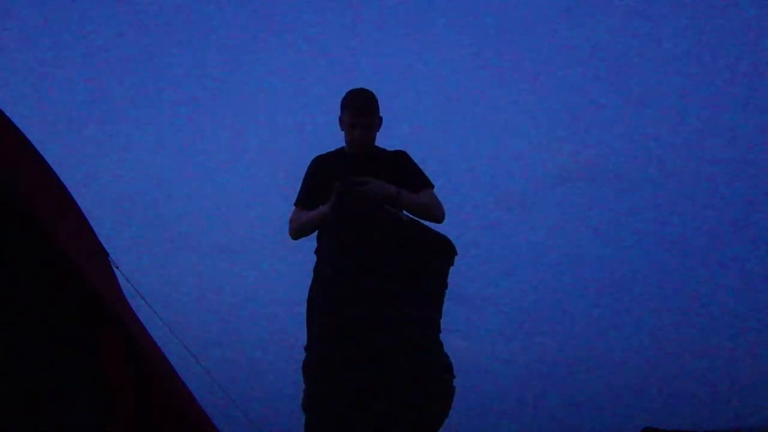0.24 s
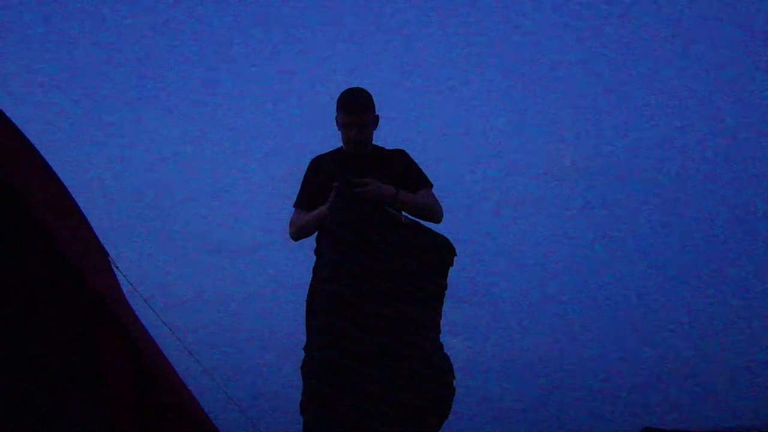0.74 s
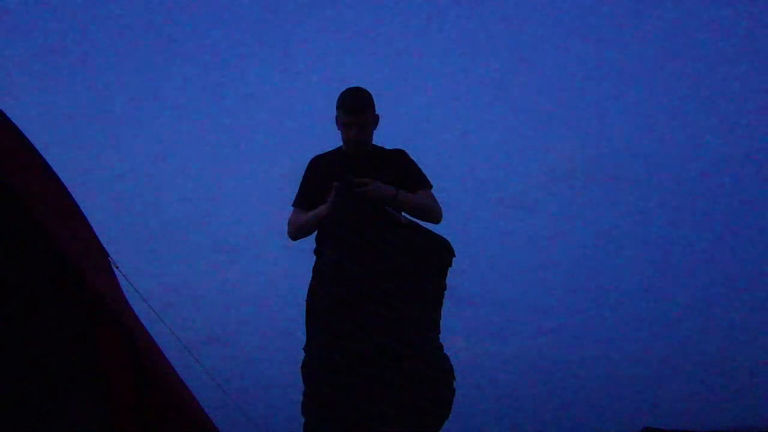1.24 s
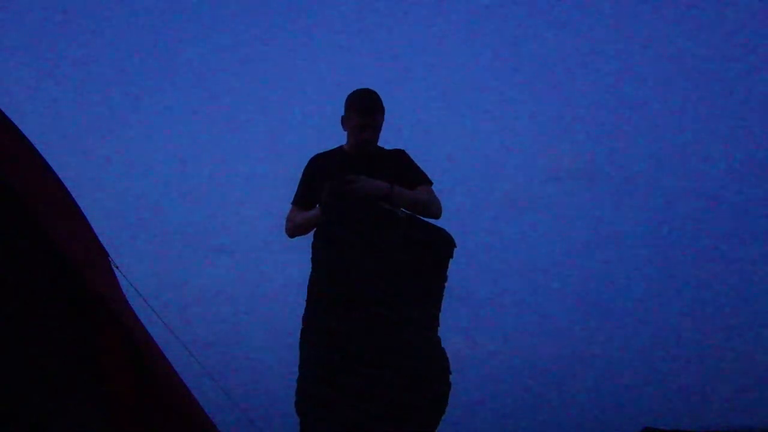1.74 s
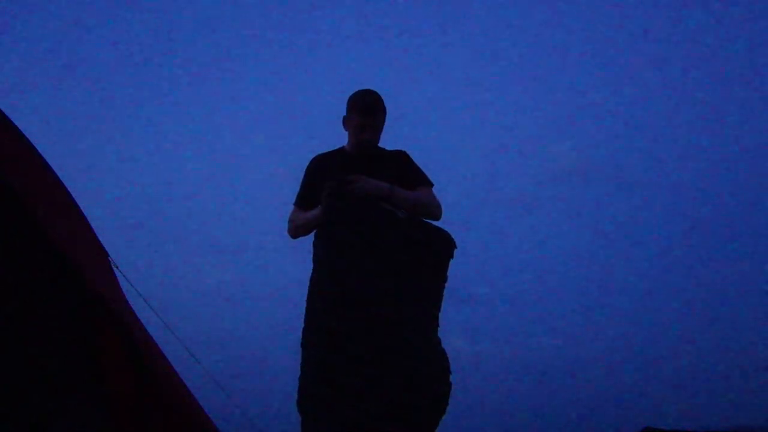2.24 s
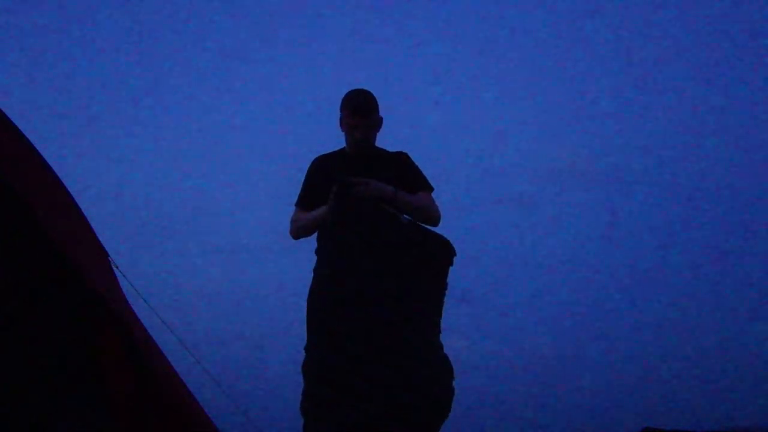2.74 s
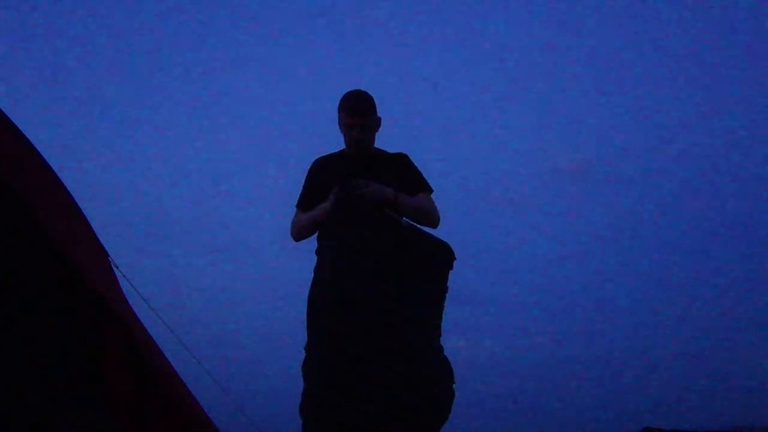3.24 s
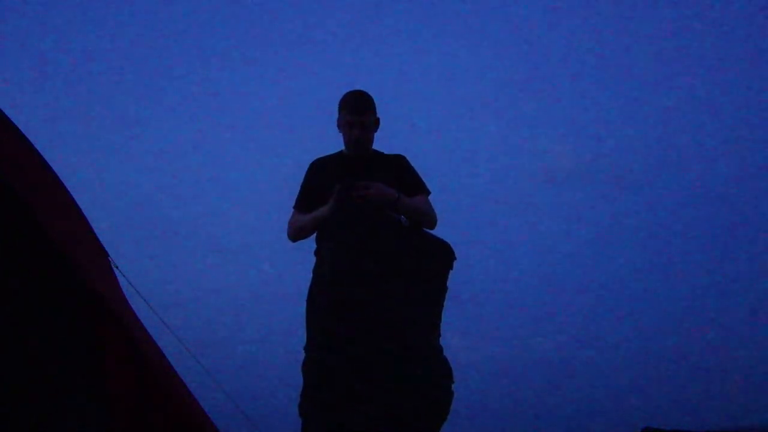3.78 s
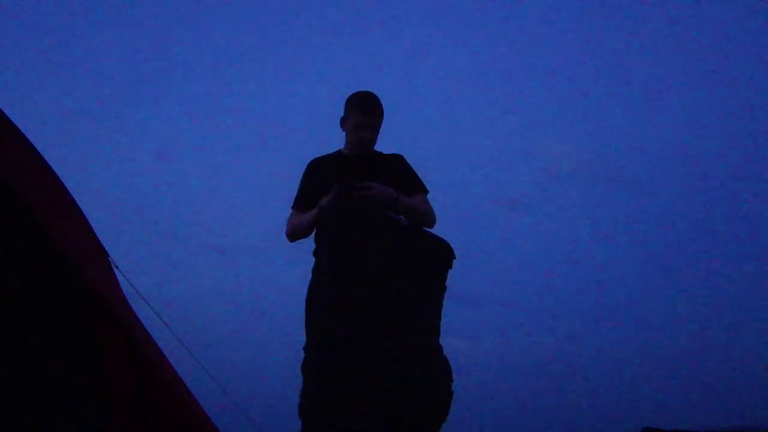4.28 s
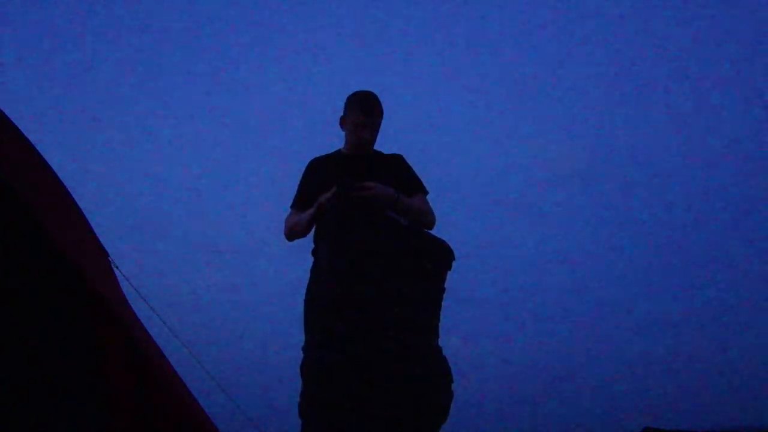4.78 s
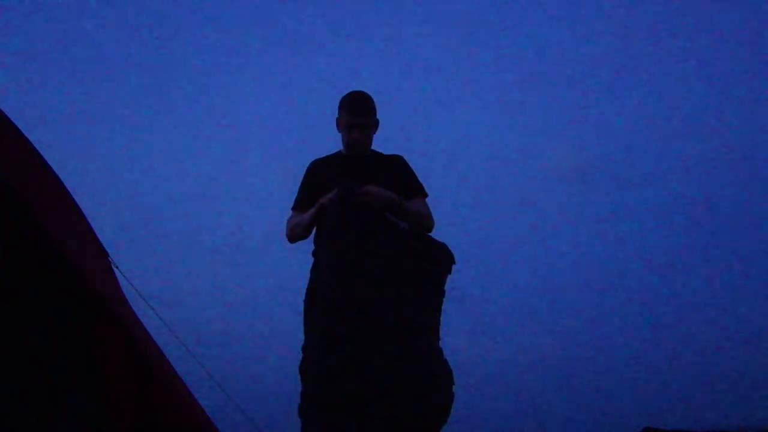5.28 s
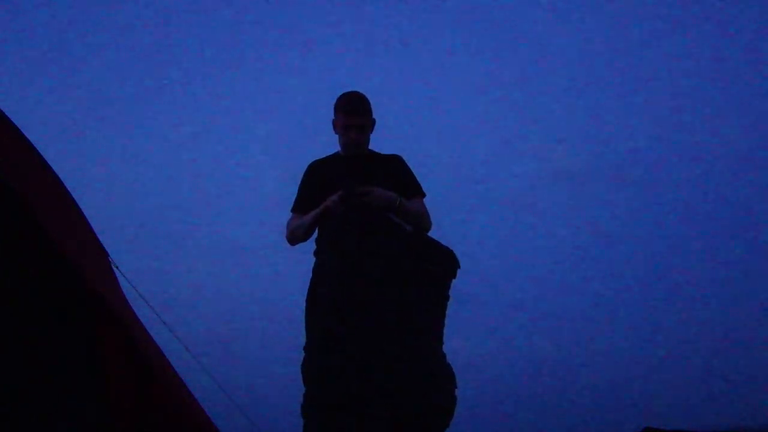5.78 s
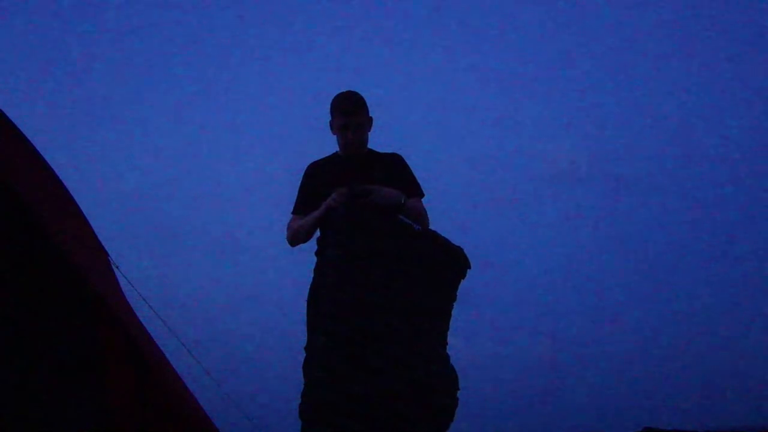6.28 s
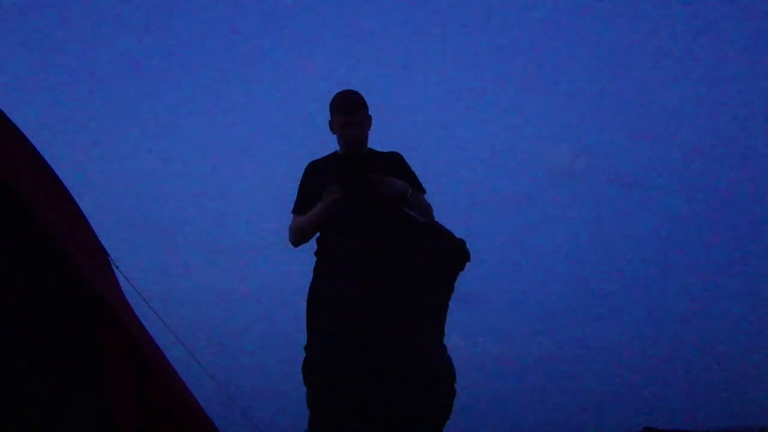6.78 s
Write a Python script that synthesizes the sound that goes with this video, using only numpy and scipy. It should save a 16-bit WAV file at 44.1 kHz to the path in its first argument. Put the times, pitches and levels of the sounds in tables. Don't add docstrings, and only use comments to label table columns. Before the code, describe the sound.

A small electric pump whines and roars with air, is switched off, whirs downward into a brief whistling sigh, then a cap clicks shut outdoors.

```python
import sys
import numpy as np
from scipy import signal
from scipy.fft import rfft, irfft, next_fast_len
from scipy.io import wavfile
from scipy.ndimage import map_coordinates

SR = 44100
rng = np.random.default_rng(int(sys.argv[2]) if len(sys.argv) > 2 else 0)


def boost(x):
    u = np.asarray(x, float) / 20
    return 10 ** u


def transcribe(u):
    v = np.clip(np.atleast_2d(u).T, -1, 1)
    q = np.round(v * 32767).astype(np.int16)
    wavfile.write(sys.argv[1], SR, q)


N = 309582
OFF_S = 4.728


def rms_one(x):
    return x / np.sqrt(np.mean(np.abs(x) ** 2) + 1e-20)


def in_time(rows):
    s, *columns = np.transpose(rows)
    return [np.interp(np.arange(N) / SR, s, c) for c in columns]


def at_hz(points, hz):
    points_hz, values = np.transpose(points)
    return np.interp(np.log(hz), np.log(points_hz), values)


def drift(rate_hz):
    r = np.exp(-80 * np.pi * rate_hz / SR)
    coarse = rng.standard_normal(N // 40 + 2002)
    slow = signal.lfilter([1], [1, -2 * r, r * r], coarse)[2000:]
    return np.interp(np.arange(N) / 40, np.arange(len(slow)), rms_one(slow - slow.mean()))


def turn(hz):
    return 2 * np.pi * np.cumsum(hz) / SR


def swell_db(s, rise_db_per_s, fall_db_per_s, bend_db=0, hold_s=0):
    t = np.arange(N) / SR - s
    after = np.maximum(t - hold_s, 0)
    return rise_db_per_s * np.minimum(t, 0) - fall_db_per_s * after - bend_db * after ** 2


def pair(mid, side, alike):
    return (np.sqrt(1 + alike) * mid + np.sqrt(1 - alike) * side * [[1], [-1]]) / np.sqrt(2)


def bands(spectrum, likeness, edges, patchy_db, change_db):
    out, white = 0, rng.standard_normal((2, 2, N))
    for k, (low, high) in enumerate(zip(edges, edges[1:])):
        band = signal.butter(3, [low, high], "band", fs=SR, output="sos")
        mid, side = signal.sosfilt(band, white[k % 2])
        hz = np.sqrt(low * high)
        flicker_db = patchy_db * (drift(0.82) + 0.64 * drift(13.0))
        level_db = at_hz(spectrum, hz) + flicker_db + change_db(hz)
        out = out + boost(level_db) * pair(mid, side, at_hz(likeness, hz))
    return out


# pitch_hz, left_right_likeness [-1..1]
NEAR_LIKENESS = [(500, .97), (2000, .955), (4000, .89), (7000, .8), (12000, .72)]


def blown(hz, width_hz):
    r = np.exp(-np.pi * width_hz * 1.55 / SR)
    swing = rng.standard_normal((2, N)) + 1j * rng.standard_normal((2, N))
    ringing = signal.lfilter([1], [1, -2 * r, r * r], swing)
    mid, side = np.real(ringing * np.exp(1j * turn(hz)))
    return rms_one(pair(mid, side, at_hz(NEAR_LIKENESS, np.median(hz))))


# start_s, rate_hz [turns per s]
SHAFT = [(0, 699.1), (.5, 702.3), (.65, 704.8), (1.1, 702.8), (1.55, 701.8), (1.7, 704.3), (2.15, 701.6),
         (2.7, 703.8), (2.9, 702.2), (3.35, 704.4), (3.75, 701.2), (4.1, 702.5), (4.728, 701.6)]


def shaft_hz():
    drag_hz, drag_s, friction_hz_per_s = 314.7, .4062, 226.9
    coast_s = np.maximum(np.arange(N) / SR - OFF_S, 0)
    lost_hz = drag_hz * (1 - np.exp(-coast_s / drag_s)) + friction_hz_per_s * coast_s
    return np.maximum(in_time(SHAFT)[0] - lost_hz, 5)


# start_s, echo_hz [lowest pitch the pad's echo cancels], shading_db
GRIP = [(0, 2670, 0.5), (.5, 2546, 1), (1.3, 2505, -1), (1.55, 2790, 0), (2.2, 2750, 0), (2.5, 2480, -0.5),
        (2.75, 2290, -0.5), (2.95, 2240, 0.5), (3.2, 2100, -4), (3.5, 2176, 0), (4.2, 2150, -4.5),
        (4.4, 2300, -8), (4.65, 2190, -9.5), (4.76, 2180, -4.5), (5.5, 2190, -8.5)]


def pad_fill():
    return np.minimum(np.arange(N) / SR / OFF_S, 1)


def layer_db(db, fill_db, shaded, lean_db, power=0):
    echo_hz, shade_db = in_time(GRIP)
    lean = (echo_hz - 2500) / 250
    speed_db = 20 * np.log10(np.minimum(shaft_hz() / 697, 1))
    return db + fill_db * pad_fill() + shaded * shade_db + lean_db * lean + power * speed_db


# start_s, length_s, shaft_multiple, level_db
COVERED = [(2.58, .2, 7, -15), (3.02, .53, 7, -14), (0, 1.4, 9, -6), (2.45, .5, 9, -7), (3.85, .55, 7, -15),
           (0, .9, 14, -14), (1.3, .2, 14, -10), (2.45, .75, 14, -9), (4.2, .6, 14, -18),
           (2.95, .95, 13, -8), (4.25, .5, 13, -12), (1.55, .75, 15, -7), (4.3, .5, 5, -8)]
HELD = {1: (-41.5, 10.5, -0.42, 2.5), 5: (-39, 4, 0.5, 0), 6: (-34.5, 8, 0.87, 1.2),
        7: (-38, -4, 0.5, -0.5), 13: (-44, -2, 1, -3.5), 14: (-37, -6.5, 0.7, 0), 15: (-39.5, -2, -0.1, 1)}
# shaft_multiple, level_db
DRIVEN = [(2, -42), (3, -36), (4, -41), (8, -56), (9, -53), (10, -62), (11, -54), (12, -50), (16, -51),
          (17, -58), (18, -51)]


def driven_partial_db(k):
    t, edge_s = np.arange(N) / SR, 0.05
    level_db = layer_db(*HELD[k]) if k in HELD else dict(DRIVEN).get(k, -90)
    for s, length_s, hidden, db in COVERED:
        if hidden == k:
            inside_s = np.minimum(t - s, s + length_s - t)
            level_db = level_db + db * np.clip(inside_s / edge_s + .5, 0, 1)
    return level_db


# pitch_hz, level_db
HOUSING = [(600, -70), (1500, -54), (2600, -64), (3600, -57.5), (5300, -64.5), (6200, -73), (7500, -80),
           (9000, -60), (9800, -58), (10450, -43.5), (11200, -51), (12200, -64), (13300, -64)]


def coasting_partial_db(k, shaft, speed_db):
    if k == 1:
        return -26.5 + 5.2 * speed_db
    level_db = at_hz(HOUSING, k * shaft) + 1.44 * speed_db
    level_db = level_db + swell_db(5.85, 0, 35)
    level_db = level_db + 5 * (k % 3 == 0) + 1 * (k % 9 == 0)
    if k <= 13:
        level_db = level_db + 13 + 3 * np.cos(2 * np.pi * k * shaft / 1000)
    return level_db + 4 * (k == 13)


def motor():
    shaft, stop_s = shaft_hz(), 6.3
    phase = turn(shaft)
    off = np.clip((np.arange(N) / SR - OFF_S) / .09, 0, 1)
    speed_db, out = layer_db(0, 0, 0, 0, power=1), np.zeros(N)
    for k in range(1, 150):
        heard = slice(np.argmax(k * shaft < 13500), int(stop_s * SR))
        level_db = (1 - off) * driven_partial_db(k) + off * coasting_partial_db(k, shaft, speed_db)
        slow_db = (0.8 + .06 * k) * (1 - off) * drift(.8)
        level_db = level_db + slow_db + (1.1 + 2.2 * off) * drift(14.)
        tone = np.sin(k * phase[heard] + rng.uniform(0, 2 * np.pi))
        out[heard] += np.sqrt(2) * boost(level_db[heard]) * tone
    return out


# pitch_hz, level_db [per Hz]
AIR = [(450, -51), (700, -18), (950, -17.5), (1200, -8), (1500, -2.5), (1800, 0), (2300, -2.5),
       (3100, -8.5), (3500, -23.5), (5100, -19), (5600, -40), (7200, -27.5), (12600, -26.5), (13300, -32)]


def roar(surge_db):
    low = layer_db(0.48, -1.05, -0.17, -0.13, power=1.7)
    mid = layer_db(-0.26, 1.2, 0.7, -1, power=2.4) + surge_db
    high = layer_db(-0.3, -1, -0.1, -1.4, power=1.5) + 0.38 * surge_db

    def change_db(hz):
        return low if hz < 2300 else mid if hz < 3600 else high

    noise = bands(AIR, NEAR_LIKENESS, np.geomspace(480, 13300, 24), 1.0, change_db)
    return boost(-22.5) * noise / np.sqrt(np.mean(noise[:, :int(4.2 * SR)] ** 2))


# start_s, pitch_hz
VALVE = [(0, 1397), (4.7, 1304), (4.795, 1273), (4.81, 1210), (4.9, 1150), (4.96, 1025), (5.02, 1055),
         (5.12, 1006), (5.38, 977), (5.56, 917)]
# level_db, fill_db, shading_share, lean_db
NOZZLE = (-30, 9, 0.22, 0.2)


def cavities(surge_db):
    t = np.arange(N) / SR
    sigh_s = 4.92
    sigh_hz = 1936 - 250 * np.clip(t - sigh_s, 0, 1)
    sigh_db = -25.5 + swell_db(sigh_s, 300, 20) + swell_db(5.7, 0, 60)
    fan_box_db = layer_db(-20.5, 3.5, 1.62, -0.3, power=2) + surge_db - 2.0
    nozzle_db = layer_db(*NOZZLE) + swell_db(OFF_S, 0, 90) - 1.5
    leak_db = -36.5 + swell_db(5.5, 14, 0, bend_db=53.5)
    rustle_db = -46 + swell_db(5.76, 110, 46)
    resonances = ((np.full(N, 2620), 600, fan_box_db),
                  (in_time(VALVE)[0], 140, nozzle_db),
                  (sigh_hz, 130, sigh_db),
                  (np.full(N, 1024), 450, leak_db),
                  (np.full(N, 3480), 1600, rustle_db))
    return sum(boost(level_db + drift(14.5)) * blown(hz, width_hz) for hz, width_hz, level_db in resonances)


# pitch_hz, width_hz
SLOTS = [(8580, 600), (10900, 590), (11530, 160), (9350, 310)]
# level_db, fill_db, shading_share, lean_db, shaft_speed_power [dB per dB]
SLOT_HISS = [(-44.5, 0, -0.59, 0.46, 3), (-36, 2.5, 1.63, .1, 2.1), (-43, 9.5, 1.2, 3, 2.2),
             (-46, 1, -0.73, 0.9, 2.2)]


def slots():
    out = 0
    for (hz, width_hz), answer in zip(SLOTS, SLOT_HISS):
        level_db = layer_db(*answer) + 1.5 * drift(2.5) + 1.7 * drift(21.0)
        out = out + boost(level_db) * blown(np.full(N, hz), width_hz)
    return out


# start_s, level_db, length_s
SURGES = [
    (.01, 1, .05),
    (3.013, 3.5, 0.013),
    (3.42, 3.5, 0.029),
    (4.855, 4.5, 0.14),
]


def airflow():
    t = np.arange(N) / SR
    surge_db = sum(db * np.exp(-((t - s) / length_s) ** 2) for s, db, length_s in SURGES)
    return (roar(surge_db) + cavities(surge_db) + slots()) * boost(0.4 * drift(32.0))


def pad_echo(x):
    echo_hz, _ = in_time(GRIP)
    mid_band = signal.butter(2, [2160, 3700], "band", fs=SR, output="sos")
    mids = signal.sosfiltfilt(mid_band, x)
    late = np.arange(N) - 3 * SR / echo_hz
    x = x - 0.4 * np.array([map_coordinates(m, [late], order=3) for m in mids])
    spin = np.exp(1j * turn(echo_hz))
    near = signal.sosfiltfilt(signal.butter(1, 55, fs=SR, output="sos"), x / spin)
    depth = .95 - .55 * pad_fill()
    return x - 2 * depth * np.real(near * spin)


# pitch_hz, level_db [per Hz]
OUTDOORS = [(30, -29), (70, -23), (110, -13), (200, -3), (450, -3), (750, -4), (1100, 3.5), (1500, -10),
            (2500, -11), (4000, -15), (7000, -21), (11000, -21), (12600, -37), (13800, -60)]
# pitch_hz, left_right_likeness [-1..1]
WIDE_LIKENESS = [(60, 0.95), (150, 0.068), (360, -0.65), (900, -0.34), (2220, -0.4), (5470, -0.39),
                 (13500, -0.071)]


def outdoors():
    bed = bands(OUTDOORS, WIDE_LIKENESS, np.geomspace(30, 13800, 20), 0.2, lambda hz: 0)
    return boost(-37) * rms_one(bed)


def electronics_whine():
    return boost(-68) * np.sin(turn(np.full(N, 7900)))


# start_s, level_db [peak], fade_db_per_s, bend_db_per_s2
WHISTLE = [
    (4.74, -20, 150, 100),
    (4.825, -21, 330, 100),
    (4.97, -31, 10, 100),
    (5.034, -11, 9, 118),
]


def whistle():
    hz, = in_time(VALVE)
    level = sum(boost(db + swell_db(s, 650, fade_db, bend_db)) for s, db, fade_db, bend_db in WHISTLE)
    phase = turn(hz * (1 + 0.00483 * drift(35.)))
    octave = boost(-19.5 + 3.6 * drift(32.0)) * np.sin(2 * phase + 0.5)
    tone = np.sqrt(2) * (np.sin(phase) + octave)
    return level * (boost(0.8 * drift(50.0)) * tone + boost(-18) * blown(hz, 130))


def ring(clicks, hz, t60_s):
    r, w = boost(-60 / (t60_s * SR)), 2 * np.pi * hz / SR
    return signal.lfilter([0, np.sin(w)], [1, -2 * r * np.cos(w), r * r], clicks + 1e-18)


# start_s, level_db [peak], t60_s, pan_db [left over right], pitch_hz
TICKS = [
    (5.638, -25, 0.0032, 0.0, 3000),
    (6.219, -25, 0.0052, -1, 750),
    (6.317, -30, 0.004, -2, 2630),
    (6.571, -25, 0.0027, -4, 4500),
    (6.623, -24.5, 0.01, -0.5, 800),
    (6.687, -27.5, 0.0035, -5, 5330),
    (6.881, -10.5, 0.003, -2.0, 3140),
    (7.014, -29, 0.0072, 2.5, 2500),
]


def ticks():
    out = np.zeros((2, N))
    for s, peak_db, t60_s, pan_db, hz in TICKS:
        click = np.zeros(N)
        click[round(s * SR)] = boost(peak_db)
        snap = ring(click, hz, t60_s) + 0.23 * ring(click, 0.71 * hz, 2.2 * t60_s)
        snap += 0.68 * np.diff(click, prepend=0)
        out += snap * boost(np.array([[.5], [-.5]]) * pan_db)
    return out


# start_s, level_db, hold_s
CAP_SLIP = [
    (6.818, -18.5, .0055),
    (6.8294, -27, .001),
    (6.8376, -28, .001),
    (6.849, -34, .001),
    (6.854, -33, .001),
]
# pitch_hz, level_db, t60_s
CAP_MODES = [(2220, -2.5, 0.0081), (3890, -4.5, 0.011), (7300, -6, 0.004), (9100, -12, .002),
             (11300, 0.5, .0015)]


def cap_scrape():
    force = sum(boost(db + swell_db(s, 30000, 3000, hold_s=hold_s)) for s, db, hold_s in CAP_SLIP)
    slips = (rng.random(N) < 4000 / SR) * force * rng.standard_normal(N)
    push = np.diff(slips, prepend=0)
    return sum(boost(db) * ring(push, hz, t60_s) * 4000 / hz for hz, db, t60_s in CAP_MODES)


# pitch_hz, level_db [left over right]
PORTS = [(500, -2.5), (1400, 1), (2100, -2), (2800, -3.5), (3500, -2.5), (4200, 4), (4900, 11), (5600, -1),
         (6400, 11), (7700, 5), (9100, -1.5), (9900, 9), (11000, 0.5), (13000, 8)]


def at_ports(x):
    size = next_fast_len(N + 2048)
    hz = np.maximum(np.fft.rfftfreq(size, 1 / SR), 1)
    half = boost(at_hz(PORTS, hz) / 2)
    lead_s = 1.8e-5 / (1 + (hz / 6500) ** 4)
    small = 1 / np.sqrt(1 + (380 / hz) ** 8)
    left = half * np.exp(2j * np.pi * hz * lead_s)
    return irfft(rfft(x, size) * small * [left, 1 / half], size)[:, :N]


def scene():
    pump = motor() + pad_echo(airflow()) + whistle()
    return at_ports(pump + ticks() + cap_scrape()) + electronics_whine() + outdoors()


def low_pass(x):
    return signal.sosfilt(signal.butter(12, 14100, fs=SR, output="sos"), x)


def record(dry):
    steep = signal.cheby2(20, 50, 13250, fs=SR, output="sos")
    mix = signal.sosfilt(steep, dry)
    return low_pass(mix)


dry = scene()
out = record(dry)
transcribe(out)
```